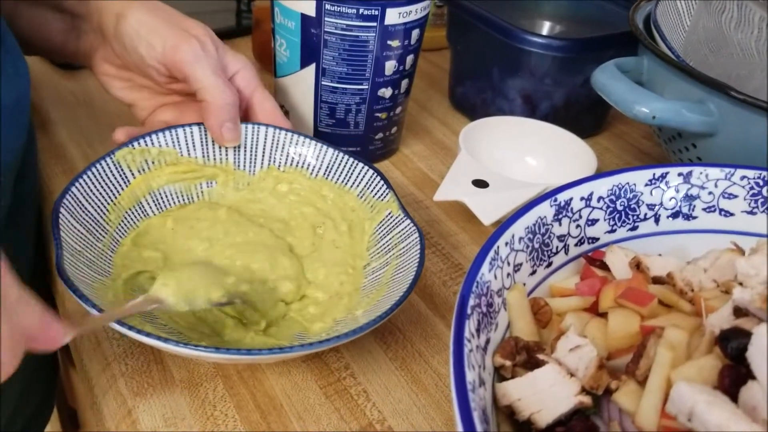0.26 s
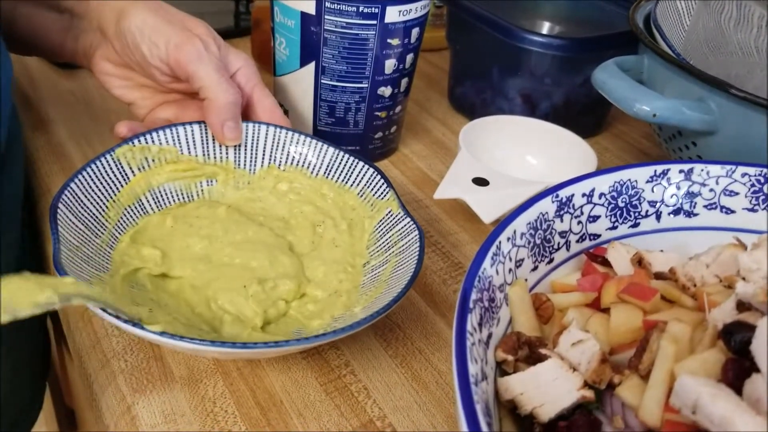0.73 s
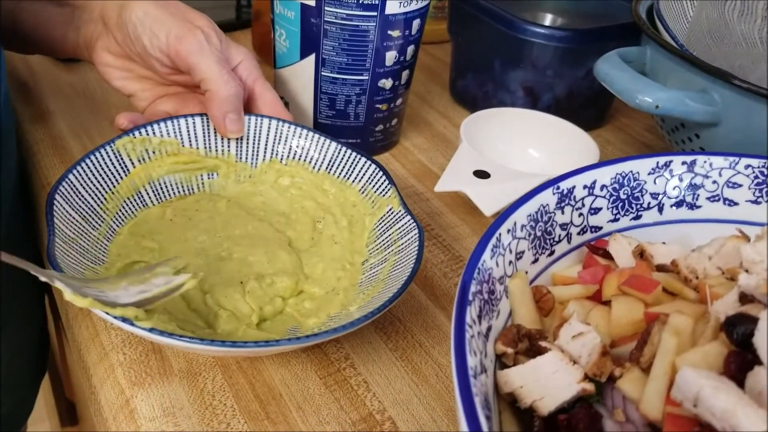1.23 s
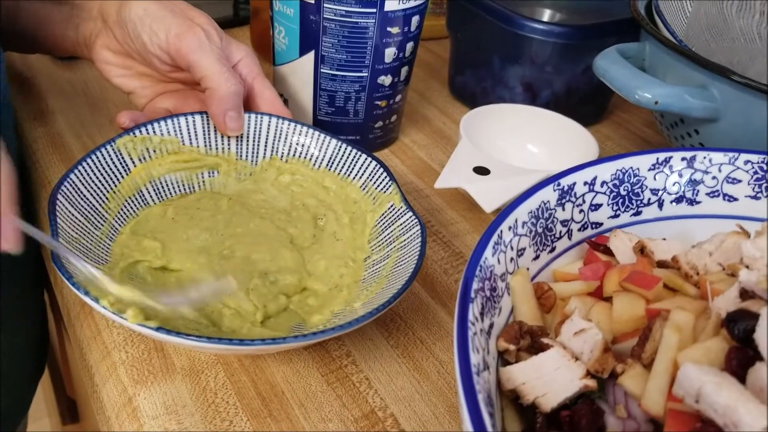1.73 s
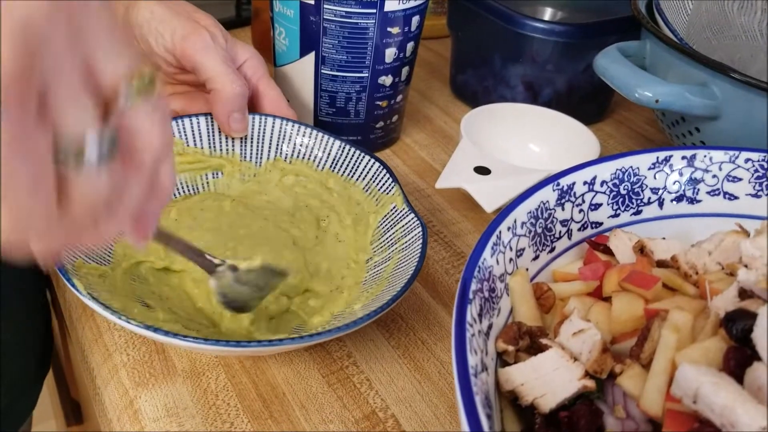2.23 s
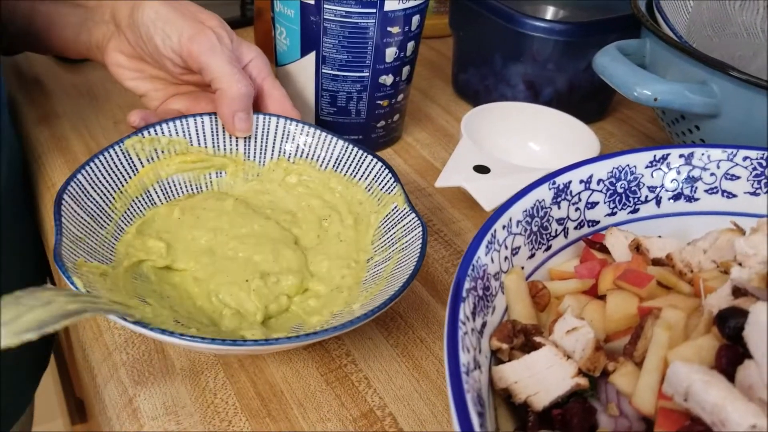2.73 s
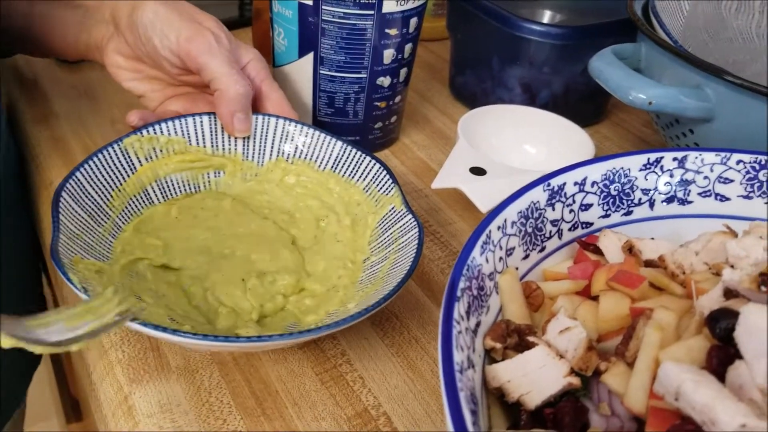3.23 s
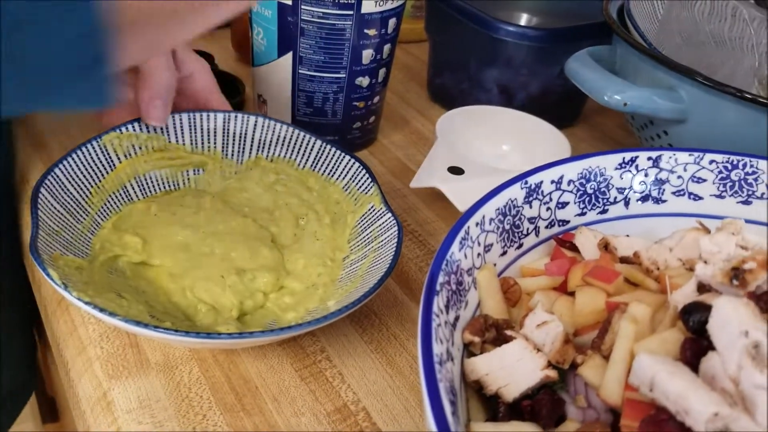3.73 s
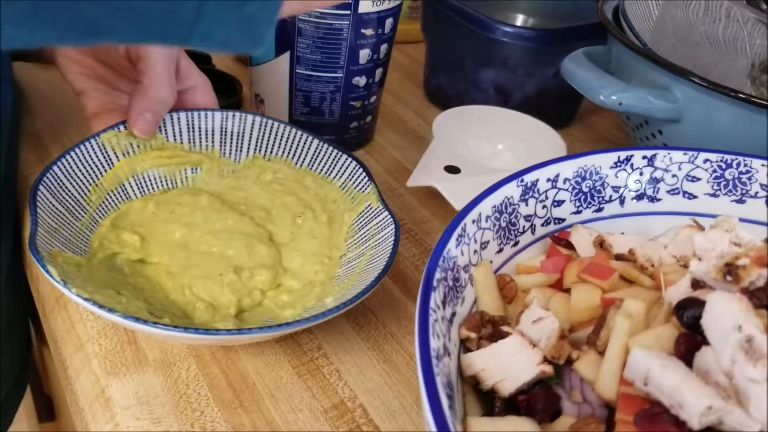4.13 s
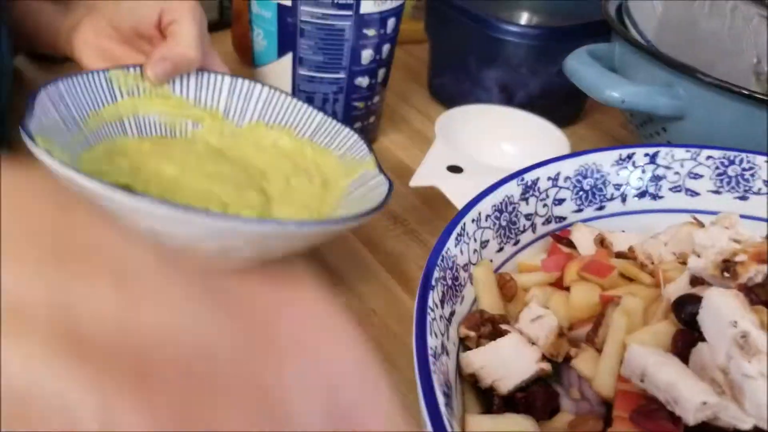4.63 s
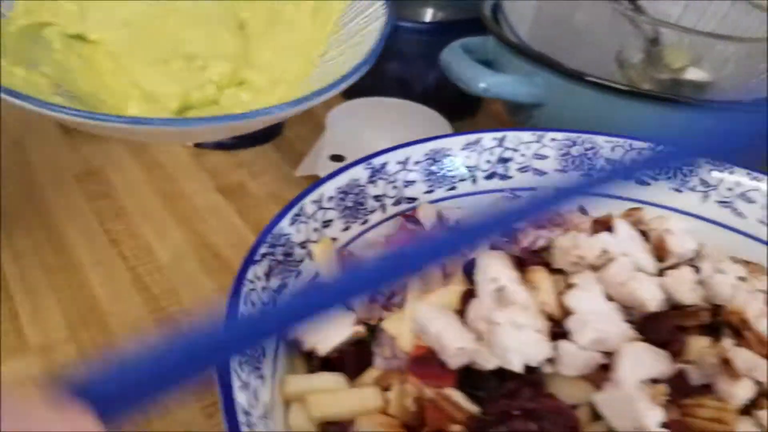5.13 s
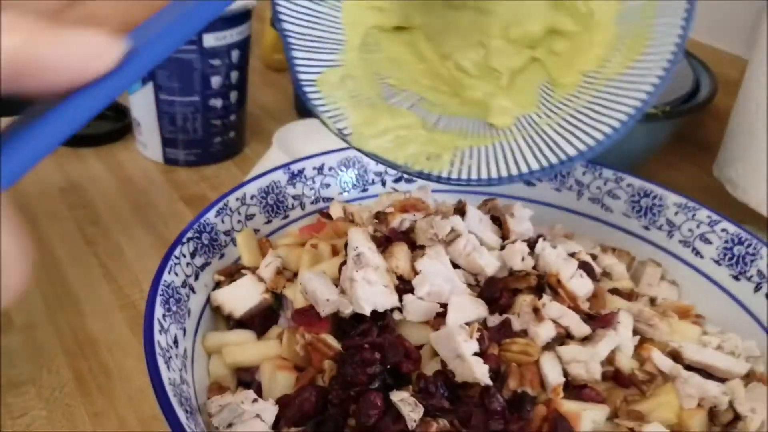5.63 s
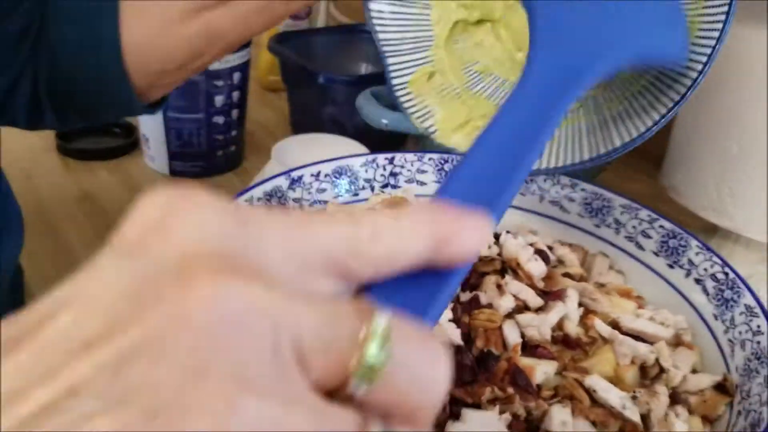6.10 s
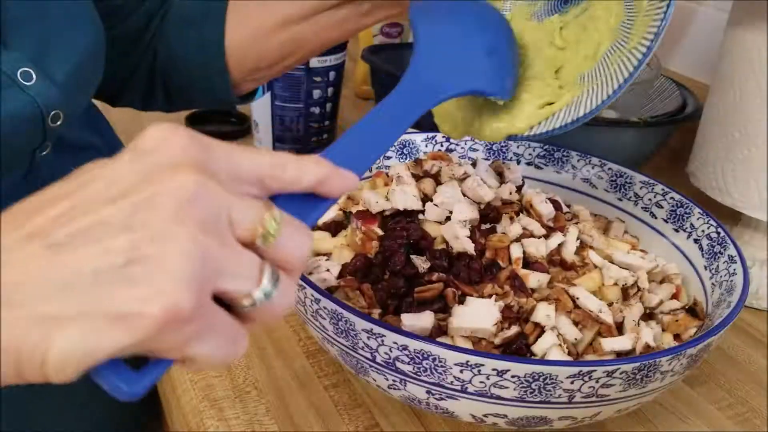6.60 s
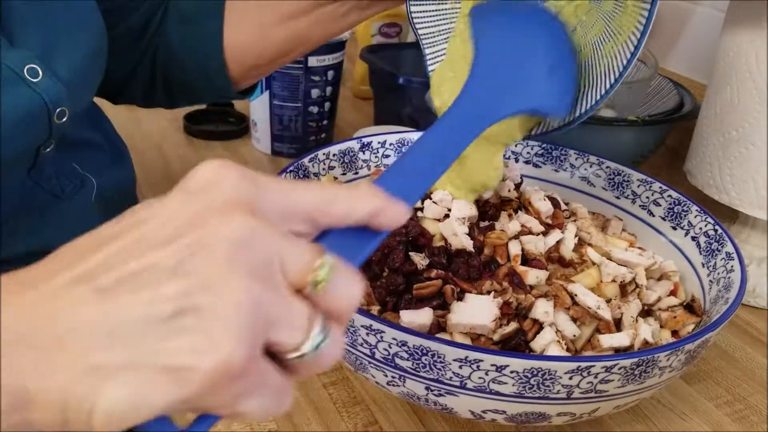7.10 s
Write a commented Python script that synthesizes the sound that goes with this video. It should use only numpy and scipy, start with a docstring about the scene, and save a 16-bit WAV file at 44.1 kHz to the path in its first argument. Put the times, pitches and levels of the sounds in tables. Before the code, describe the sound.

Spoon taps, gritty scrapes and dull counter thuds, then a bright clattering landing in a dish, followed by sleeve rustle, light ticks and a brief rubbery squeak.

```python
"""From the start, a kitchen hums and hisses softly: noise shaped by low room tones and a broad spectrum.
First a steel spoon taps and scrapes a bowl of thick dressing, and the counter thuds: noisy pushes ring their tones.
Near 4 s the spoon lands rattling in a dish. Then the bowl is lifted, sleeves rustle as shaped noise, the cook
steps, and a soft spatula ticks and wipes. At 6.55 s the sound fades almost to silence and back into a
second scene, set louder, where a rubber edge sticks and slips into a squeak."""
import sys
import numpy as np
from scipy import signal
from scipy.fft import rfft, irfft, next_fast_len
from scipy.io import wavfile
from scipy.ndimage import uniform_filter1d, map_coordinates

SR = 44100
rng = np.random.default_rng(int(sys.argv[2]) if len(sys.argv) > 2 else 0)


def unload_wav(signal):
    """Save mono or channel-first audio to the path in sys.argv[1] as 16-bit WAV at rate SR, clipped to [-1, 1]."""
    wavfile.write(
        sys.argv[1],
        SR,
        np.round(np.clip(np.atleast_2d(signal).T, -1, 1) * 32767).astype(np.int16),
    )


N = 324561  # samples, about 7.4 s

# All levels here are relative: gains, filters and the louder second scene come on top.
# Dull, edge and sheen levels are relative to the level in the same row.

# Room tones behind the hum: pitch_hz, width_hz, level_db
ROOM_TONES = [(60, 9.7, -10), (94, 14, 3), (159, 21, 3.5), (212, 35, -5), (287, 29, -5)]
# Strength of the hum over time: time_s, level_db
HUM_LEVEL = [(0, -52.5), (.6, -56), (1.5, -54.5), (2.2, -62.5), (2.9, -61.5), (3.6, -58.5), (4.4, -58),
             (6.5, -66), (6.6, -67), (7.36, -65.5)]
# Colour of the broad hiss: pitch_hz, level_db
AIR_COLOUR = [(25, -23.5), (45, -11), (160, -2), (400, -18.5), (950, -15.5), (2500, -47), (6000, -38),
              (16300, -43.5)]
# Strength of the hiss over time: time_s, level_db
AIR_LEVEL = [(0, -65), (6.5, -67.5), (6.6, -71), (7.36, -64.5)]
# How alike left and right are in spread-out noise: pitch_hz, likeness (-1 to 1)
LEFT_RIGHT_LIKENESS = [(60, 0.92), (240, 0.92), (950, -0.021), (3770, -0.17), (15000, -0.12)]
# How long the kitchen echoes take to die by 60 dB: pitch_hz, decay_s
KITCHEN_DECAY = [(200, 0.6), (2000, 0.38), (10000, 0.2)]
# The same for scatter off the counter and crockery: pitch_hz, decay_s
NEARBY_DECAY = [(500, 0.062), (10000, 0.035)]

# Sleeves and spatula swishing: start_s, length_s, start_level_db, end_level_db, sheen_db
SWISHES = [(4.556, 0.13, -80, -69.5, -2), (4.754, 0.096, -58, -65.5, -5.5), (4.879, 0.15, -72, -70.5, 6),
           (5.141, 0.15, -75, -69, 10), (5.343, .39, -68.5, -54.5, -6.5), (5.762, .21, -64, -59, -6.5),
           (6.002, 0.17, -52, -49, -7.5), (6.194, 0.297, -55, -59, -7.5), (6.593, 0.055, -63, -70, -12.5),
           (6.875, 0.086, -59, -56, -15), (7.014, 0.12, -61.5, -59.5, -2.5)]
# Faint stirring of clothes while the bowl is carried: same columns as the swishes
CLOTHES_STIR = (5, 1.5, -74, -77, 0)
# Colour of the cloth hiss: pitch_hz, level_db
CLOTH_COLOUR = [(200, -33), (350, -4.5), (1100, -2), (1900, -5.5), (3800, -8), (5000, -18), (7000, -38.5)]
# Colour of the brighter hiss: pitch_hz, level_db
SHEEN_COLOUR = [(2350, -21.5), (4000, -8.5), (6280, -9), (8220, -14), (12200, -17.5), (16200, -28.5)]
# Colour of the low rumble: pitch_hz, level_db
RUMBLE_COLOUR = [(15, -35), (25, -13), (92, 5), (129, -6), (162, 6.5), (239, -9.5), (299, -3), (441, -23.5),
                 (500, -16), (650, -61.5), (1100, -120)]
# Strength of the low rumble over time: time_s, level_db
RUMBLE_LEVEL = [(4.4, -92), (4.6, -79), (5.4, -63), (6.5, -60), (6.6, -79.5), (6.93, -79), (7.36, -66.5)]
# The cook shifts weight: middle_s, level_db
STEPS = [(5.554, -52.5), (5.792, -50.5), (6.092, -51.5), (6.434, -50.5)]

# Soft knocks through the counter: start_s, level_db
THUDS = [(0.133, -30), (0.147, -27.5), (0.208, -35.5), (0.539, -40.5), (0.827, -31), (0.849, -38.5),
         (1.109, -37.5), (1.755, -32.5), (1.965, -36.5), (2.394, -36.5), (2.825, -47.5), (2.999, -34.5),
         (3.422, -39.5), (3.442, -41.5), (3.459, -40.5), (3.957, -44.5), (4.14, -31), (4.194, -36.5),
         (4.257, -36), (4.337, -32), (4.357, -32.5), (4.395, -33)]
# Tones of the counter: pitch_hz, width_hz, level_db
COUNTER_TONES = [(156, 12, 1), (213.5, 29, 4.5), (258, 58, 3), (317, 7.7, -1.5), (363, 14, -19),
                 (653, 300, -14.5)]

# Spatula edge scratching the lifted bowl: start_s, length_s, start_level_db, end_level_db
WIPES = [(6.0, 0.22, -57, -58.5), (6.92, 0.091, -66.5, -63.5), (7.03, 0.077, -63.5, -61)]
# The blade pushes into the dressing: start_s, length_s, start_level_db, end_level_db
SHOVES = [(6.62, .04, -62, -56.5)]
# Tone of the spatula blade: pitch_hz, width_hz, level_db
BLADE_TONES = [(696, 170, -2)]
# Rubber slipping on glaze: start_s, length_s, start_level_db, end_level_db
SQUEAKS = [(6.902, 0.034, -40, -47.5), (6.944, 0.012, -39.5, -43.5), (6.975, 0.046, -55.5, -73)]
# Overtones of the squeak: multiple of the slip rate, level_db
SQUEAK_OVERTONES = [(1, -3), (2, -2.5), (3, -19)]
# Spatula and rings ticking on the lifted bowl: start_s, level_db, dull_db, pitch_hz (the strongest tone)
TICKS = [(5.8068, -33.5, 0.5, 5620), (5.8723, -42.5, -1, 5900), (6.0029, -40, 4, 7100),
         (6.1358, -36.5, -8, 5430), (6.1482, -32.5, -5, 5320), (6.4009, -32, 1, 3710),
         (6.8609, -33, 1, 6460), (6.9129, -39.5, 6, 6500), (6.993, -45, -11, 3900),
         (7.0531, -42.5, -18, 3250), (7.0893, -40, -5, 3350), (7.132, -43, -14, 5330)]
# Tones of the lifted bowl: pitch_hz, width_hz, level_db
LIFTED_TONES = [(770, 240, 3), (1870, 270, 0), (3730, 450, 3.5), (5440, 880, -0.5), (7240, 1200, -16.5),
                (10290, 900, -10.5)]

# Spoon landing in the dish: start_s, level_db, dull_db
DISH_BLOWS = [(3.9629, -16.5, -17.5), (3.9744, -16, -4), (4.112, -35.5, 8), (4.1425, -10.5, -14.5),
              (4.1515, -9.5, -7), (4.1774, -20, -6.5), (4.2024, -24.5, -28.5), (4.2448, -20, -10.5),
              (4.2595, -12.5, -10)]
# Tones of the dish: pitch_hz, width_hz, level_db
DISH_TONES = [(900, 30, -4), (2126, 36, 0.5), (3440, 55, -10), (3668, 20, 7), (5610, 60, -4),
              (6510, 90, -17), (7878, 36, -6), (8500, 170, -18), (10315, 55, -9), (10520, 80, -12),
              (10950, 80, -12), (11545, 75, -9.5), (12605, 70, -12), (13500, 100, -23), (15010, 40, -15)]
# Left over right for the dish: pitch_hz, difference_db
DISH_BALANCE = [(60, -0.5), (240, -3.5), (950, 10), (3770, 5.5), (15000, -11.5)]

# Spoon tapping the bowl: start_s, level_db, dull_db, edge_db
TAPS = [(0.129, -27, -28, -2), (0.1453, -12.5, -24, -9.5), (0.3013, -26, -7.5, -4), (0.3866, -29, -18, 2),
        (0.4551, -31, -13, -2), (0.5124, -38, -13, 8), (0.6165, -40.5, -25, -6), (1.0222, -31.5, -1, -8),
        (1.1538, -35.5, -15, -2), (1.2371, -32, -7.5, 1), (1.756, -11.5, -9, 5.5), (1.8547, -27, -16, 6),
        (1.8687, -28.5, -4.5, 4), (1.8843, -28, -2.5, 4.5), (1.944, -33, -0.5, -9.5), (1.953, -26, -3, -1),
        (1.9663, -21, -12.5, -4), (2.367, -27, -5, -1), (2.3736, -30, 2.9, -8.5), (2.672, -41.5, -14, 2),
        (2.9974, -12, -8.5, -6.5), (3.1326, -32, -21, -8.5)]
# Spoon dragged along the glaze: start_s, length_s, start_level_db, end_level_db, dull_db
DRAGS = [(0.202, 0.36, -50, -51.5, -3.5), (0.26, 0.044, -53.5, -46.5, -8.5),
         (0.593, 0.098, -61.5, -55.5, -18), (1.043, .24, -65, -61.5, 2), (1.3, .21, -48.5, -55, -1.6),
         (1.86, 0.04, -57.5, -56, 4), (1.932, 0.023, -47, -42, -4.5), (2.394, .24, -58, -53.5, -3),
         (2.5, 0.039, -60, -55.5, -7.5), (2.635, 0.092, -63.5, -78.5, -13), (3.065, 0.061, -52.5, -46, -2),
         (3.148, 0.12, -41, -47.5, -8)]
# The pressed spoon shudders: start_s, length_s, start_level_db, end_level_db
SHUDDERS = [(1.858, 0.04, -45, -48.5), (3.14, 0.056, -56.5, -69)]
# Tones of the bowl: pitch_hz, width_hz, level_db
BOWL_TONES = [(797, 96, 4), (1265, 120, -6.5), (1727, 160, 3.5), (2798, 110, 2), (4270, 80, 5),
              (5780, 130, 2.5), (5800, 56, -6.5), (6064, 250, -11), (7750, 360, -3), (9680, 190, -21),
              (12100, 150, -22), (14400, 1300, -26.5)]
# Tone of the shuddering spoon: pitch_hz, width_hz, level_db
SPOON_TONES = [(1280, 110, 0)]
# Extra force from the spoon's thin edge: pitch_hz, width_hz, level_db
EDGE_BAND = [(6500, 3000, 0)]
# Contact noise that escapes between the tones: pitch_hz, level_db
CONTACT_NOISE = [(300, -17.5), (700, -3), (1700, -6), (2300, -8), (3800, -2), (4900, -13.5), (6500, -7),
                 (9200, -25.5), (16000, -28.5)]
# Share of the force that rings the bowl at its higher tuning: time_s, share (0 to 1)
HIGHER_SHARE = [(0, .8), (.25, .8), (.6, 0.3), (3.3, 0.27)]
# Left over right for the bowl: pitch_hz, difference_db
BOWL_BALANCE = [(60, 2.5), (380, -1), (2380, 3), (15000, 1.5)]

STEP_S = 0.11  # half width of one swell of weight
SWISH_RISE_S, SWISH_FALL_S = 0.024, 0.056
PUSH_S, PUSH_DB = 0.00091, 12.5  # smooth push that starts a thud: time constant, extra level
SLIPS_HZ, SLIPS_RISE_HZ_PER_S = 306.4, 110  # slip rate as the first squeak starts, and its climb
GRIP_S, SLIP_S = 0.006, 0.014  # rise and fall of squeaks, shoves and shudders
TONE_DB, TONE_T60_S = -2.5, 0.021  # the one short tone of each tick: level, time to fall 60 dB
TOUCH_S, LIFT_S = 0.033, 0.02  # the spoon settles on the glaze and leaves it
SKID_DB, SKID_T60_S, SKID_DULL_DB = -23.5, 0.19, -4  # skid after each tap: level under it, decay, dull part
RUB_NOISE_DB = -1  # friction noise over the ringing while the spoon slides
DETUNE, SLOSH = 0.016, 0.25  # dressing shifts every tone up or down by this share; wander of HIGHER_SHARE
CHATTER_GROWS = 0.27  # harder blows chatter longer: dB of duration per dB of blow
FADE_MIDDLE_S, FADE_S, FADE_DB = 6.55, 0.037, -45  # fade between scenes: middle, half width, depth
SECOND_SCENE_DB = 4  # the second scene is set louder
TOP_HZ = 16400  # no sound is kept from here up


def amp(db):
    """Turn decibels into a gain."""
    return 10 ** (np.asarray(db) / 20)


def unit(x):
    """Scale a sound to an average strength (rms) of 1."""
    return x / np.sqrt(np.mean(x ** 2) + 1e-20)


def along(points, hz):
    """Read a curve of (pitch, value) points, spacing pitch by its logarithm."""
    pitch, value = np.transpose(points)
    return np.interp(np.log(hz + 1), np.log(pitch + 1), value)


def curve(points):
    """Join (time, value) points by straight lines, one value per sample."""
    time, value = np.transpose(points)
    return np.interp(np.arange(N) / SR, time, value)


def wobble(rate):
    """Draw a smooth random curve with rate random points a second."""
    points = rng.standard_normal(int(N * rate / SR) + 4)
    return map_coordinates(points, [np.arange(N) * rate / SR])


def filtered(x, response):
    """Change the strength and timing of each pitch in x as response says."""
    size = next_fast_len(N + SR // 2)  # spare room lets the ringing die
    spectrum = rfft(x, size) * response(np.fft.rfftfreq(size, 1 / SR))
    return irfft(spectrum, size)[..., :N]


def modes(table, f):
    """Add up the ringing tones of an object; between neighbours they cancel into valleys."""
    total = 0
    for centre, width, db in table:
        resistance = 1j * f * np.abs(width)
        total = total + amp(db) * 1j * f * width / (centre ** 2 - f ** 2 + resistance + 1e-9)
    return total


def patchy(x, patchy_db):
    """Make x louder and softer in random patches of time and pitch."""
    grid = signal.stft(x, nperseg=512)[2]
    field = rng.standard_normal(grid.shape[-2:])  # shared by left and right
    field = uniform_filter1d(uniform_filter1d(field, 6, 0), 8, 1)
    return signal.istft(grid * amp(patchy_db * unit(field)), nperseg=512)[1][..., :N]


def strokes(rows, rise, fall):
    """Give each row a loudness curve: rise, slide between two levels, fall."""
    t = np.arange(N) / SR
    start, length, first_db, last_db = np.transpose(rows)[:4, :, None]
    opening = np.clip(1 + (t - start) / abs(rise), 0, 1)  # fully open at the start time
    closing = np.clip(1 - (t - start - length) / abs(fall), 0, 1)
    slide_db = first_db + (last_db - first_db) * np.clip((t - start) / length, 0, 1)
    return (opening * closing) ** 2 * amp(slide_db)


def bursts(times, levels_db, chatter, rise):
    """Make each contact a burst of noisy force that swells, then falls 60 dB in chatter seconds or less."""
    force, t = np.zeros(N + SR), np.arange(SR // 4) / SR
    for s, db in zip(times, levels_db):
        lasts = max(chatter * amp(CHATTER_GROWS * (db - max(levels_db))), 1e-3)
        shape = (1 - np.exp(-t / max(rise, 1e-4))) * amp(-60 * t / lasts)
        burst = shape * rng.standard_normal(len(t))
        burst = burst * np.linalg.norm(shape) / np.linalg.norm(burst)  # even out lucky draws
        force[round(s * SR):][:len(t)] += amp(db) * burst
    return force[:N]


def body(bright, dull, table, noise_db, split_hz=2500, higher=None):
    """Ring high tones by sharp force and low tones by blunt force, with some contact noise escaping."""
    def low(f):
        return 1 / (1 + 1j * f / split_hz) ** 2

    def high(f):
        return (1 - 1 / (1 + 1j * f / split_hz)) ** 2

    def ring(x, scale):
        return filtered(x, lambda f: modes(table, f / scale) + amp(noise_db + along(CONTACT_NOISE, f)))

    force = filtered(bright, high) + filtered(dull, low)
    if higher is None:
        return ring(force, 1)
    return ring(force * np.sqrt(higher), 1 + DETUNE) + ring(force * np.sqrt(1 - higher), 1 - DETUNE)


def struck(hits, table, gain_db, noise_db, chatter, rise, higher=None):
    """Ring one object by a table of blows, each with a bright, a dull and perhaps an edge part."""
    s, db, dull_db, *edge_db = np.transpose(hits)
    bright = bursts(s, db + gain_db, chatter, rise)
    dull = bursts(s, db + dull_db + gain_db, chatter, rise)
    for extra_db in edge_db:
        edge = bursts(s, db + extra_db + gain_db, chatter, rise)
        bright = bright + filtered(edge, lambda f: modes(EDGE_BAND, f) ** 2)
    bright = patchy(bright, patchy_db=1.5)  # each blow lands on another spot and favours other tones
    return body(bright, dull, table, noise_db, higher=higher)


def rubbing(rows, table, rise, fall):
    """Ring an object's tones by grainy, patchy friction."""
    grains = amp(4.5 * wobble(500) + 3.5 * wobble(60))
    grit = unit(grains * patchy(rng.standard_normal(N), patchy_db=3.5))
    return strokes(rows, rise, fall).sum(0) * unit(filtered(grit, lambda f: modes(table, f)))


def rush(response, patchy_db):
    """Make patchy stereo noise whose left and right are partly alike at each pitch."""
    pair = patchy(rng.standard_normal((2, N)), patchy_db)

    def mix(hz):
        turn = np.arccos(np.clip(along(LEFT_RIGHT_LIKENESS, hz), -1, 1)) / 2
        return np.abs(response(hz)) * [np.cos(turn), np.sin(turn)]

    mid, side = filtered(pair, mix)
    return unit(np.array([mid + side, mid - side]))


def placed(x, balance, lag):
    """Place x in stereo: left lags right by lag seconds and differs in level by pitch."""
    side = np.array([[1], [-1]])
    return filtered(x, lambda f: amp(side * along(balance, f) / 2) * np.exp(-1j * np.pi * f * lag * side))


def echo(x, decays):
    """Answer x with stereo echoes, each pitch dying at its own speed."""
    hz, t, grid = signal.stft(rng.standard_normal((2, SR // 2)), SR, nperseg=128)
    fading = amp(-60 * t / along(decays, hz)[:, None])
    tail = signal.istft(grid * fading, SR, nperseg=128)[1]
    tail = tail / np.linalg.norm(tail[0])
    delayed = np.pad(x, (40, 0))[None]  # samples, about 0.9 ms
    return signal.fftconvolve(delayed, tail, axes=1)[:, :N]


def kitchen_air():
    """Broad hiss, and appliance noise caught in the low tones of the room."""
    hum = rush(lambda f: modes(ROOM_TONES, f), patchy_db=1.5)
    hiss = rush(lambda f: amp(along(AIR_COLOUR, f)), patchy_db=3)
    return amp(curve(HUM_LEVEL) + 1.1 * wobble(9.8)) * hum + amp(curve(AIR_LEVEL)) * hiss


def moving():
    """Fabric and wiping hiss with a brighter sheen; the cook's steps and grip rumble below."""
    rows, t = SWISHES + [CLOTHES_STIR], np.arange(N) / SR
    swishes = strokes(rows, SWISH_RISE_S, SWISH_FALL_S)
    flutter = amp(1.6 * wobble(25) + 1.4 * wobble(250))  # fibres and wet dressing catch and let go
    cloth = swishes.sum(0) * rush(lambda f: amp(along(CLOTH_COLOUR, f)), patchy_db=2.57)
    sheen_level = amp(np.transpose(rows)[-1]) @ swishes
    sheen = sheen_level * rush(lambda f: amp(along(SHEEN_COLOUR, f)), patchy_db=3.0)
    weight = amp(curve(RUMBLE_LEVEL))
    for s, db in STEPS:
        weight = weight + amp(db) * np.exp(-((t - s) / STEP_S) ** 2)
    rumble = weight * amp(0.83 * wobble(12)) * rush(lambda f: amp(along(RUMBLE_COLOUR, f)), patchy_db=1.5)
    return flutter * (cloth + sheen) + rumble


def knocks():
    """Blunt pushes make the counter thud: one smooth push, with a noisy shudder."""
    s, db = np.transpose(THUDS)
    starts = np.bincount(np.round(s * SR).astype(int), amp(db + 24.0 + PUSH_DB), N)
    push = filtered(starts, lambda f: 1 / (1 + 2j * np.pi * f * PUSH_S) ** 2)
    shudder = bursts(s, db + 21.5, chatter=0.11, rise=0.0066)
    return filtered(push + shudder, lambda f: modes(COUNTER_TONES, f) / (1 + 1j * f / 800) ** 2)


def wipes():
    """The spatula scratches the hand-held bowl and shakes its own blade."""
    scratches = rubbing(WIPES, LIFTED_TONES, SWISH_RISE_S, SWISH_FALL_S)
    return scratches + rubbing(SHOVES, BLADE_TONES, GRIP_S, SLIP_S)


def squeak():
    """The rubber edge sticks and slips almost regularly, and each slip shakes the blade."""
    hz = SLIPS_HZ + SLIPS_RISE_HZ_PER_S * (np.arange(N) / SR - SQUEAKS[0][0])
    phase = 2 * np.pi * np.cumsum(hz * (1 + 0.0299 * wobble(140))) / SR
    tone = 0
    for multiple, db in SQUEAK_OVERTONES:
        tone = tone + amp(db + 4.7 * wobble(90)) * np.sin(multiple * phase)
    jolts = unit(np.cos(phase / 2) ** 8 * rng.standard_normal(N))  # one puff of noise per slip
    shaken = filtered(jolts, lambda f: modes(BLADE_TONES, f) ** 2)
    return strokes(SQUEAKS, GRIP_S, SLIP_S).sum(0) * (unit(tone) + amp(17.5) * shaken)


def ticks():
    """Each tick rings the held bowl, and the spot that is hit adds one short tone."""
    tones, t = np.zeros(N + SR), np.arange(SR // 10) / SR
    for s, db, _, hz in TICKS:
        fading = amp(db + TONE_DB - 60 * t / TONE_T60_S)
        onset = np.clip(t / 0.00092, 0, 1)
        tones[round(s * SR):][:len(t)] += fading * np.sin(2 * np.pi * hz * t) * onset
    hits = [row[:3] for row in TICKS]
    return tones[:N] + struck(hits, LIFTED_TONES, gain_db=3, noise_db=1.0, chatter=0.018, rise=0.00033)


def dish_clatter():
    """The landing spoon strikes the dish several times and rings its narrow tones."""
    return struck(DISH_BLOWS, DISH_TONES, gain_db=17.0, noise_db=-12.0, chatter=0.05, rise=0.0024)


def bowl():
    """Taps, and gritty friction between them, ring the same damped bowl."""
    drags, t = strokes(DRAGS, TOUCH_S, LIFT_S), np.arange(N) / SR
    skid = np.zeros(N)  # after each tap the spoon skids on
    for s, db, *_ in TAPS:
        skid += (t > s) * amp(db + SKID_DB - 60 * np.abs(t - s) / SKID_T60_S)
    sharp = drags.sum(0) + skid
    blunt = amp(np.transpose(DRAGS)[-1]) @ drags + amp(SKID_DULL_DB) * skid
    bumps = amp(3.5 * wobble(600) + 2.6 * wobble(110))  # the uneven glaze breaks the force into grains

    def grit():  # the moving contact favours now one tone, now another
        return unit(bumps * patchy(rng.standard_normal(N), patchy_db=3.5))

    higher = np.clip(curve(HIGHER_SHARE) + SLOSH * wobble(30), 0, 1)
    scrape = amp(5.5) * body(sharp * grit(), blunt * grit(), BOWL_TONES, RUB_NOISE_DB, higher=higher)
    shudder = rubbing(SHUDDERS, SPOON_TONES, GRIP_S, SLIP_S)
    taps = struck(TAPS, BOWL_TONES, gain_db=10.0, noise_db=-6.5, chatter=0.021, rise=0.0015, higher=higher)
    return scrape + shudder + taps


def scene():
    """Put each object at its place between two spaced microphones, with its echoes."""
    near, dish = bowl(), dish_clatter()
    held = ticks() + squeak() + wipes()
    direct = placed(near, BOWL_BALANCE, lag=-0.00017) + placed(dish, DISH_BALANCE, lag=0.00022)
    direct = direct + placed(held, [(1000, 0.68)], lag=-0.000036) + knocks()
    room = amp(-10.5) * echo(near, KITCHEN_DECAY) + amp(-6) * echo(dish, KITCHEN_DECAY)
    room = room + amp(-8.0) * echo(held, KITCHEN_DECAY)
    scatter = amp(-3) * echo(near + dish, NEARBY_DECAY)
    return direct + scatter + room + moving() + kitchen_air()


def record(dry):
    """Fade almost to silence between the scenes, raise the second, and drop everything from TOP_HZ up."""
    t = np.arange(N) / SR - FADE_MIDDLE_S
    dip_db = FADE_DB * np.clip(1 - np.abs(t) / FADE_S, 0, 1)
    return filtered(dry * amp(dip_db + SECOND_SCENE_DB * (t > 0)), lambda hz: hz < TOP_HZ)


dry = scene()
out = record(dry)
unload_wav(out)
```